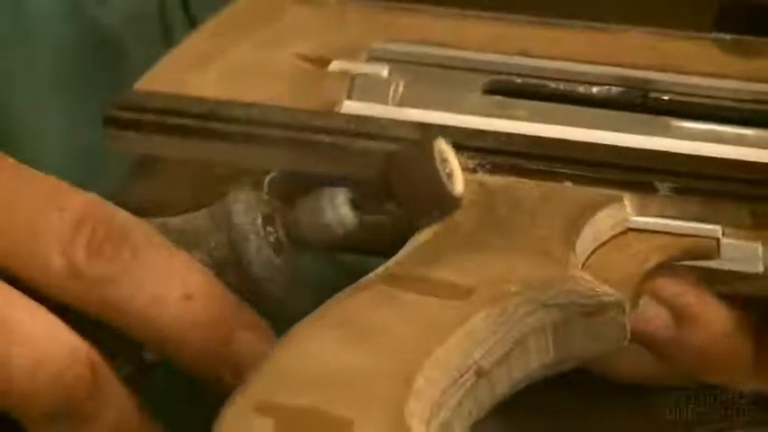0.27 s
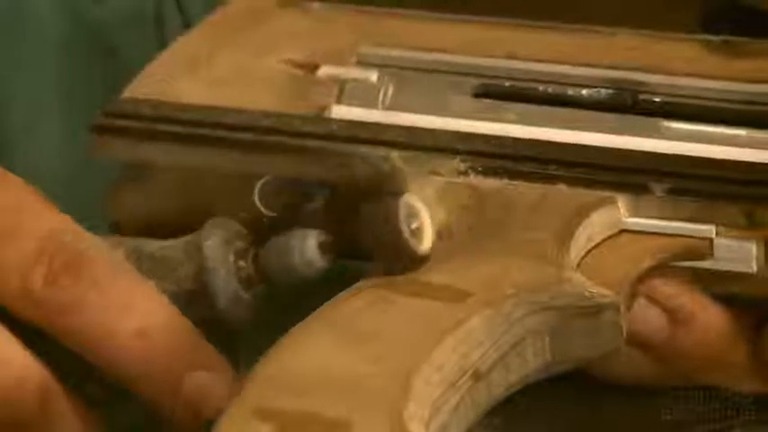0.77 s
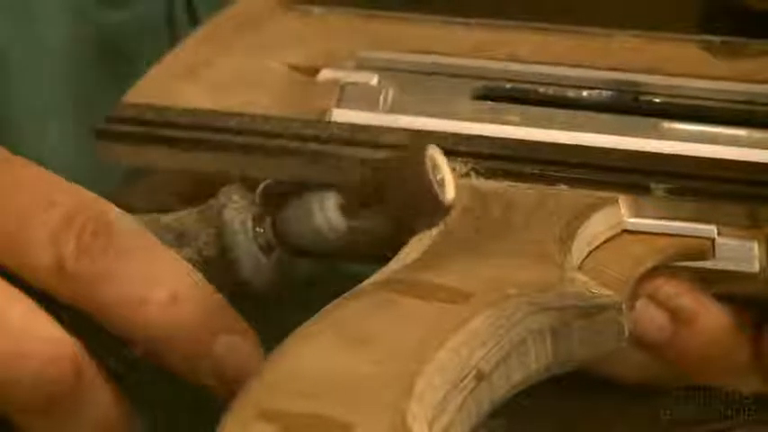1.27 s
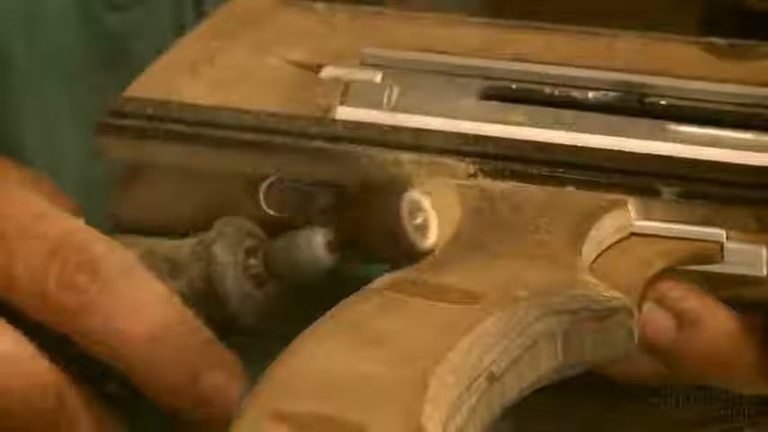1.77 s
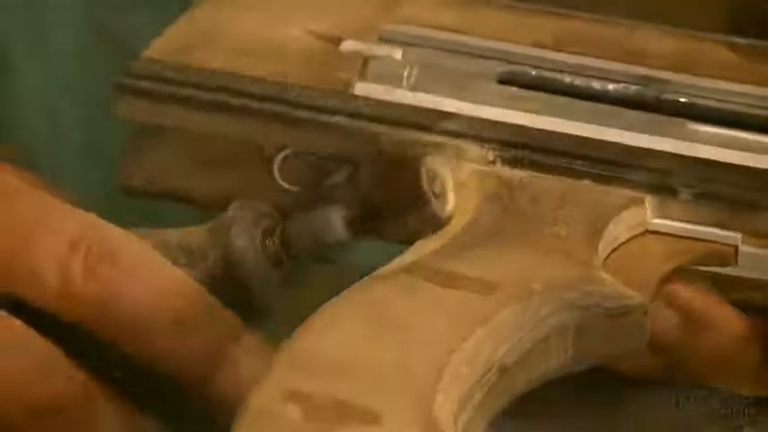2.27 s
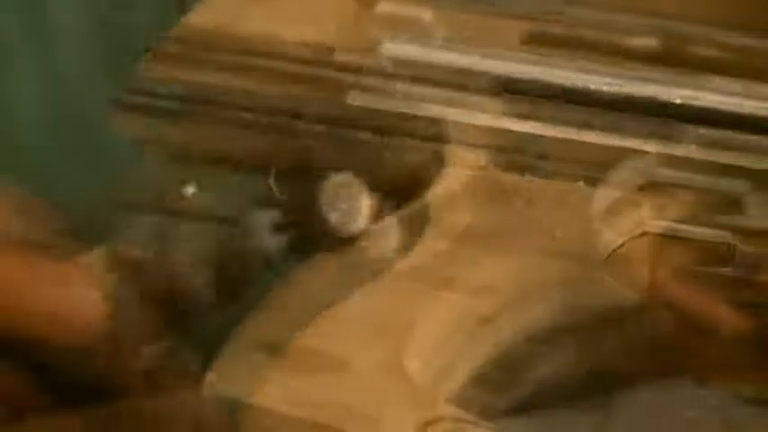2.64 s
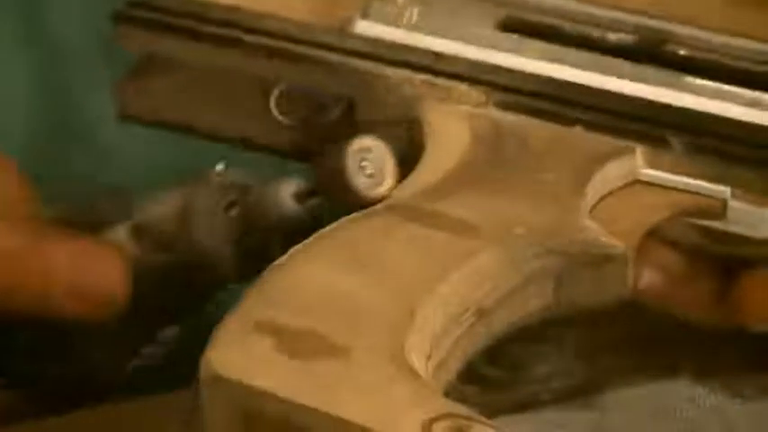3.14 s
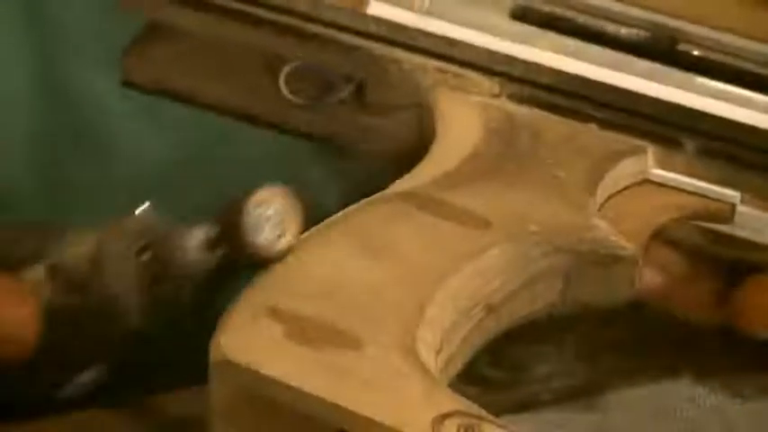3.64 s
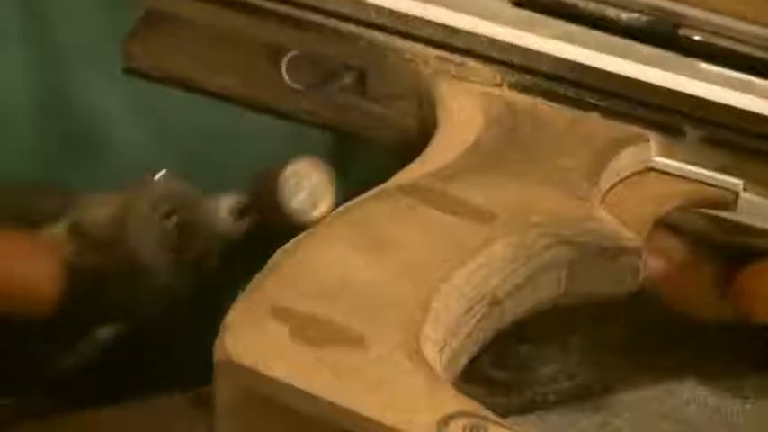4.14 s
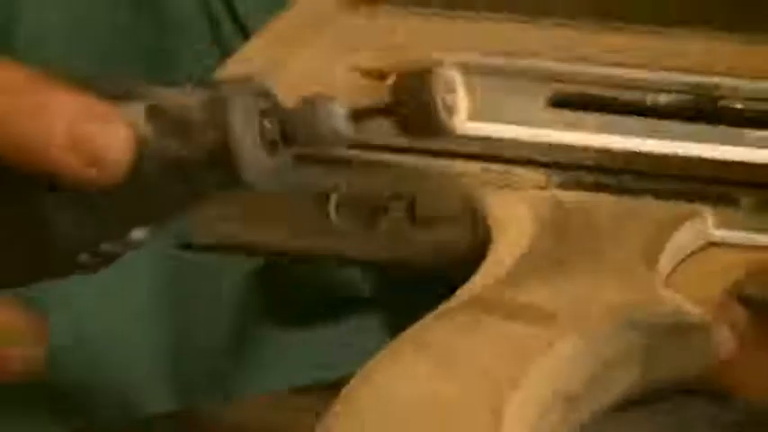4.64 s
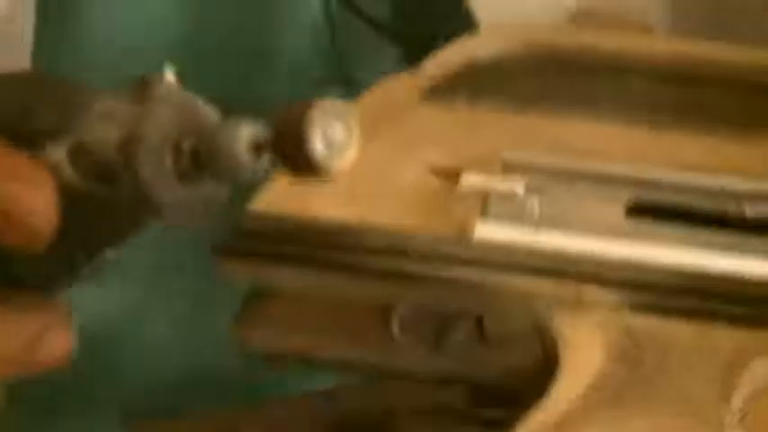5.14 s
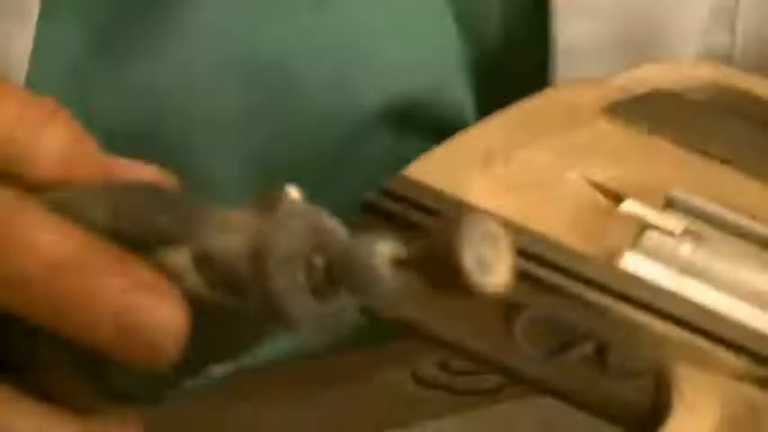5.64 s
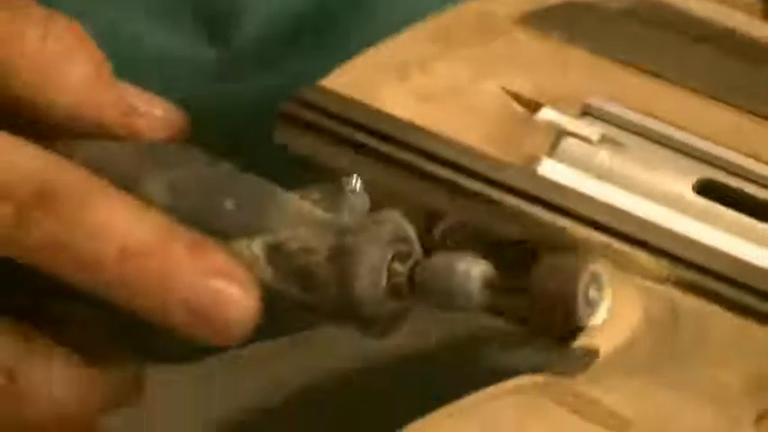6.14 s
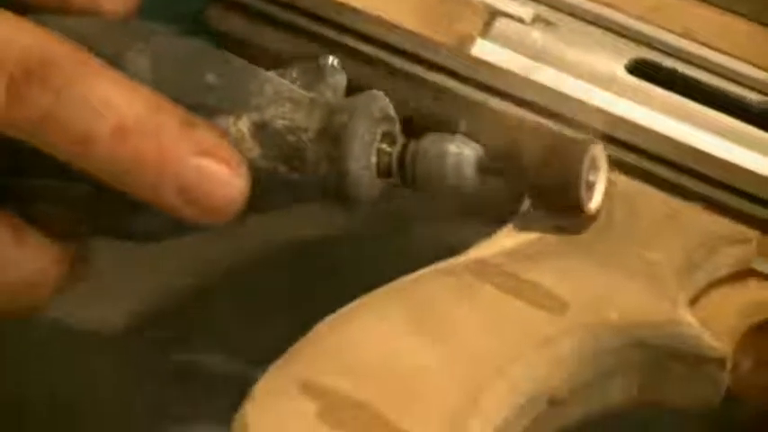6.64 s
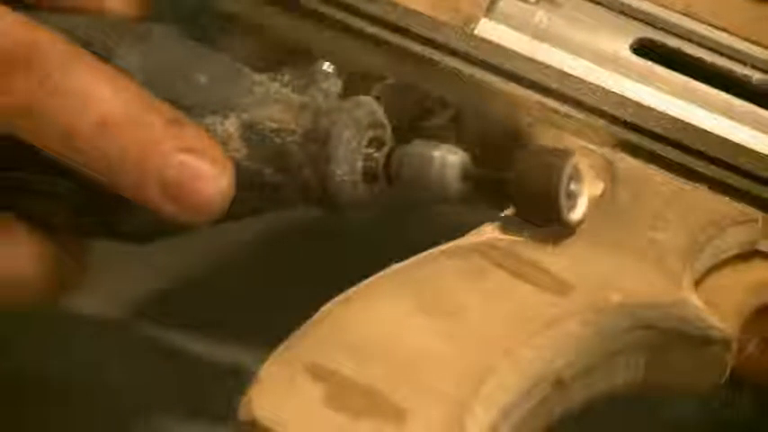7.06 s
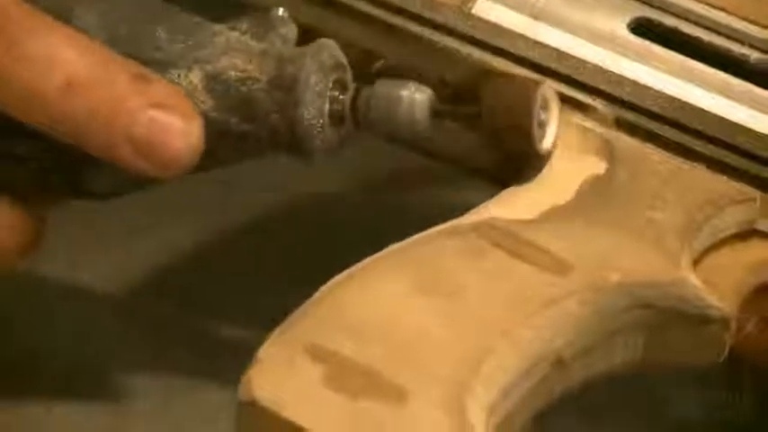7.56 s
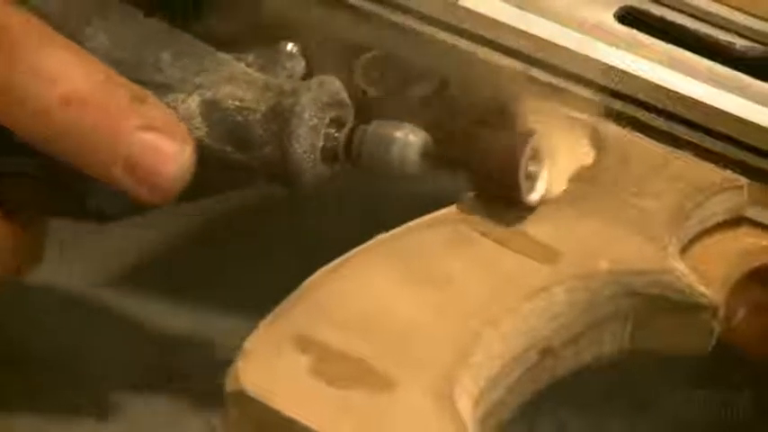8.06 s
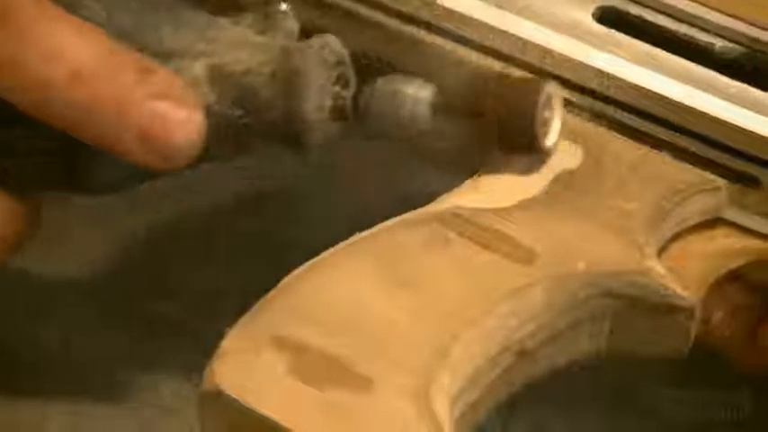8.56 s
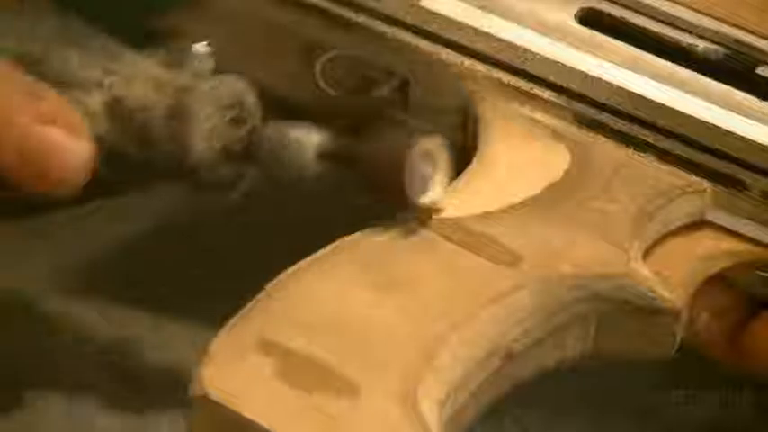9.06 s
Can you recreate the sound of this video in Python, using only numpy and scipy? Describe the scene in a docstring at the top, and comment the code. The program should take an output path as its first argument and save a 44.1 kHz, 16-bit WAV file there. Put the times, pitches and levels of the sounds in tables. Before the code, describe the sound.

A small handheld rotary tool with a sanding drum runs continuously, close and dry, over very faint low workshop rumble. From 0 to 2.3 s a slower, buzzy whine with steady harmonics makes five strokes on wood, roughly two per second; in each the pitch sags and gritty hiss swells mid-stroke, with a light scrape tap at 0.1 and 1.5 s. Around 2.4 s it quickly cross-fades to a much higher, louder, richer whine, with lighter strokes until 4.2 s. From 4.3 to 6.2 s the tool runs free and swings past: treble hiss rises, peaking near 5.4 s, and cooling air buffets the microphone with low puffs, strongest at 5.3 to 5.55 s. At 6.5 s the drum catches with a tiny skip, and sanding resumes, the whine dipping and fluttering through rasping strokes until 9.3 s, with small taps near 8.8 s.

```python
"""A handheld rotary tool sands wood close to a microphone: first a whine at a slow setting, in long strokes.
Each stroke along the wood changes the grit's hiss, mostly upward, and drags the speed down.
Near 2.4 s a cross-fade leads to a fast setting. Both whines are sines at multiples of the shaft speed,
rippled by the mains, with ball bearing lines between them; grit and fan air are noise pulsing with the turn.
From 4.3 to 6.2 s the tool swings past and its cooling air buffets the microphone; then sanding goes on."""
import sys
import numpy as np
from scipy import signal
from scipy.fft import rfft, irfft, next_fast_len
from scipy.io import wavfile
from scipy.ndimage import uniform_filter1d, map_coordinates

SR = 44100
rng = np.random.default_rng(int(sys.argv[2]) if len(sys.argv) > 2 else 0)


def transcribe(signal):
    """Save signal, clipped to [-1, 1], as a 16-bit WAV file at the path in sys.argv[1]."""
    frames = np.atleast_2d(signal).T
    limited = np.clip(frames, -1, 1)
    pcm = np.round(limited * 32767).astype(np.int16)
    wavfile.write(sys.argv[1], SR, pcm)


def makeup_ratio(level_db):
    """Linear amplitude ratio for a level in decibels (20 dB per factor of ten)."""
    decades = np.asarray(level_db, float) / 20
    return 10 ** decades


N = 410571
T = np.arange(N) / SR
STEP = 64  # samples between two values of a slow control
SLOW = T[::STEP]  # times at which slow controls are worked out
SWITCH_S = 2.425  # the fast setting takes over here


def unit(x):
    """Scale to rms 1."""
    return x / np.sqrt(np.mean(x ** 2) + 1e-20)


def along(points, hz):
    """Read (Hz, value) points on a log frequency axis."""
    f, v = np.transpose(points)
    return np.interp(np.log(hz + 1), np.log(f + 1), v)


def curves(rows):
    """One value per sample for each column after the time."""
    s, *cols = np.transpose(rows)
    return [np.interp(T, s, c) for c in cols]


def drift(rate):
    """A smooth random curve at the slow times, with up to 39 random knots a second."""
    knots = rng.standard_normal(int(N * 40 / SR))
    return map_coordinates(knots, [SLOW * min(rate, 39)])


def wobble(rate):
    """The same random curve, one value per sample."""
    return np.interp(T, SLOW, drift(rate))


def capped(x):
    """Dips pass freely, rises level off."""
    return np.minimum(x, np.tanh(x))


def filtered(x, response):
    """x times a response of frequency."""
    m = next_fast_len(N + 8192)
    return irfft(rfft(x, m) * response(np.fft.rfftfreq(m, 1 / SR)), m)[..., :N]


def noise(colour, patchy_db):
    """Coloured noise of rms 1 in long narrow patches; the dark ones go deeper than the bright ones rise."""
    z = signal.stft(rng.standard_normal(N), nperseg=512)[2]
    field = uniform_filter1d(rng.standard_normal(z.shape), size=3, axis=0)
    field = unit(uniform_filter1d(field, size=30, axis=1))
    patched = signal.istft(z * makeup_ratio(patchy_db * capped(field)), nperseg=512)[1][:N]
    return unit(filtered(patched, lambda hz: makeup_ratio(along(colour, hz))))


def tool():
    """The whines of both settings cross-fade around the switch, under the shared hiss."""
    fast_share = np.interp(T, [1.95, SWITCH_S, SWITCH_S + .004, 2.85], [0, .45, .8, 1])
    slow_heard, fast_heard = np.sqrt(1 - fast_share), np.sqrt(fast_share)
    # the strong lines fade on their own: the fast ones early and softly, the slow ones with a short tail
    before = T < SWITCH_S
    leaving = np.where(before, 1, np.interp(T, [SWITCH_S, 3.0], [.33, 0]))
    coming = np.where(before, np.interp(T, [1.98, SWITCH_S], [.25, .6], left=0), 1)
    slow_turn, slow_lines = setting(False, grit(), 32, leaving, slow_heard)
    over_usual_db = curves(RASP_LEVEL)[0] + 34
    fast_turn, fast_lines = setting(True, over_usual_db, 22, coming, fast_heard)
    turn = np.where(before, slow_turn, fast_turn)
    return slow_lines + fast_lines + hiss(turn, slow_heard, fast_heard)


# How the tool's body sounds and how firmly it meets the wood:
# (time [s], housing roar [dB], weaker shaft lines over the rasp [dB], contact with the wood [0-1])
BODY = [(0, -45, 5.5, 1), (2.3, -45, 0.5, 0.43), (2.45, -44, -1, 0.12), (2.8, -42, 7.5, 0.6),
        (3.2, -42, -8, 0.87), (4.3, -41.5, 6.5, 0.36), (5.5, -43.5, 12.5, 0.24), (6.5, -41.5, 9, 0.43),
        (6.7, -41, 6, 0.74), (7.8, -40.5, 7, 0.69), (9.31, -39.5, 10.5, 1)]


def setting(fast, drive_db, top_order, share, heard):
    """The tool at one speed: returns the shaft angle and all its lines, pulsing a little with the mains."""
    ripple = np.sin(2 * np.pi * 120 * T)  # rectified mains shakes torque and speed
    shaft_hz = shaft(fast)
    angle = shaft_angle(shaft_hz, ripple)
    roar_db, others_db, contact = np.array(curves(BODY))[:, ::STEP]
    pressed = np.minimum(strokes()[0].sum(axis=0), 1)[::STEP]
    strong = strong_orders(angle, fast, drive_db[::STEP], contact, pressed)
    weak = weak_orders(angle, shaft_hz[::STEP], fast, top_order, others_db, contact, pressed)
    balls = bearing(angle, roar_db)
    return angle, strong * share * (1 + 0.04 * ripple) + heard * (weak + balls)


def line(angle, order, db, sway_db, blur, rate):
    """One sine at a multiple of the shaft turn; as the grip changes its phase drifts and its level sways."""
    phase = order * angle + rng.uniform(0, 2 * np.pi) + np.interp(T, SLOW, blur * drift(25))
    sway = capped(drift(rate)) + .5 * drift(38)  # slow part dips deeper than it rises, plus a flutter
    level = np.interp(T, SLOW, makeup_ratio(db + sway_db * sway))
    return np.sqrt(2) * level * np.sin(phase)


# Strong lines of the slow whine:
# (shaft order [multiple of shaft speed], level [dB], level gained per dB of stroke grit [dB/dB])
SLOW_ORDERS = [(1, -49, 0.9), (2, -56, 0.7), (3, -47.5, -0.05), (6, -47, 0), (7, -49, 0.93), (18, -51.5, 0)]
# Strong lines of the fast whine:
# (shaft order [multiple of shaft speed], level [dB], level gained per dB of rasp over its usual [dB/dB])
FAST_ORDERS = [(1, -41.5, 0.0), (2, -37, 0.6), (3, -38.5, 0.0), (4, -38.5, 1.1), (5, -38.5, 1.3),
               (6, -41, 0.72), (7, -44, 1.44), (8, -49, 1.16), (9, -46, 1.06), (10, -52.5, 1.26),
               (11, -53.5, 1.25), (14, -54.5, 2), (18, -43, 1.25)]


def strong_orders(angle, fast, drive_db, contact, pressed):
    """The strong lines of the whine; the higher ones sway and blur more while the drum presses on the wood."""
    total = 0
    for row_order, db, grows in FAST_ORDERS if fast else SLOW_ORDERS:
        k = round(row_order)
        dropouts = breaks(contact * min(k, 8) / 8 * (k < 12))
        level_db = db + grows * drive_db + swell(k, fast) + dropouts
        sway_db = 2 + (0.47 * contact + 1.1 * pressed) * (min(k - 1, 5) / 3) ** 0.69
        blur = 0.15 + 0.064 * k * (contact + pressed)
        total = total + line(angle, k, level_db, sway_db, blur, rate=10)
    return total


# Tone colour of the weaker lines: (frequency [Hz], level added [dB])
WEAK_COLOUR = [(1500, -19), (3300, -26), (4600, -28.5), (5400, -21), (7350, -26), (8200, -24), (10800, -27)]


def weak_orders(angle, shaft_hz, fast, top_order, others_db, contact, pressed):
    """All other multiples of the shaft speed, following the rasp and flickering with contact and pressure."""
    strong = [round(row[0]) for row in (FAST_ORDERS if fast else SLOW_ORDERS)]
    base_db = others_db + (curves(RASP_LEVEL)[0] + 1.13 * grit() + 1.17 * landings())[::STEP]
    flare_db = 5 * (.5 * contact + 1.1 * pressed)
    total = 0
    for k in range(1, top_order):
        if k in strong:
            continue
        colour_db = along(WEAK_COLOUR, k * shaft_hz)
        colour_db = colour_db + 3 * (1 - 1.8 * contact) * capped(drift(4.5))
        colour_db = colour_db + flare_db * (0.16 + capped(drift(24)))
        level_db = base_db + colour_db + swell(k, fast) + breaks(contact)
        total = total + line(angle, k, level_db, 2 + 2.0 * contact, 1.5 * contact, rate=10 + k / 2)
    return total


# Lines of the balls passing in the bearing: (shaft order [multiple of shaft speed], level over the roar [dB])
BALL_LINES = [(3.451, -14), (4.447, -20), (5.451, -13.5)]


def bearing(angle, roar_db):
    """Balls roll past at uneven multiples of the shaft speed, so their lines fall between the others."""
    return sum(line(angle, k, roar_db + db, sway_db=4.5, blur=0.29, rate=9.7) for k, db in BALL_LINES)


# The drum catches and the whine skips: (time [s], jump [share of a turn])
SKIPS = [(6.515, 0.417), (6.524, 0.1016)]


def shaft_angle(shaft_hz, ripple):
    """Adds up the speed into an angle; the mains ripple on it gives side lines that grow with the order."""
    angle = 2 * np.pi * np.cumsum(shaft_hz) / SR + 0.019 * ripple
    for s, turns in SKIPS:
        angle = angle + 2 * np.pi * turns * np.clip((T - s) / 0.0022, 0, 1)
    return angle


# Steady load between strokes, slow then fast setting: (time [s], drag [% of free speed])
SLOW_DRAG = [(0.0, 9.5), (1.0, -0.0), (2.45, 10)]
FAST_DRAG = [(1.999, 4.0), (2.598, 5.5), (3.8, -0.0), (4.3, 1), (5.202, 0.66), (6.449, 0.72), (6.801, 6.5),
             (7.502, 3.5), (8.201, 8.5), (9.31, -0.5)]


def shaft(fast):
    """Load pulls the speed down; the rotor's inertia lets it sag and recover with one time constant."""
    free_hz, steady = (532.2, FAST_DRAG) if fast else (385.8, SLOW_DRAG)  # speed of the unloaded shaft
    press, drag, late = strokes()
    load = curves(steady)[0] + (drag * (late == fast)) @ press
    rotor_s = .48
    keep = np.exp(-1 / (rotor_s * SR))
    sag = load[0] + signal.lfilter([1 - keep], [1, -keep], load - load[0])
    return free_hz * (1 - sag / 100)


# The drum is pushed along the wood:
# (start [s], let go [s], grit change before fading and scaling [dB], drag at full pressure [% of free speed])
STROKES = [(0.052, 0.496, 6, 13.7), (0.692, 1.071, 3.5, 19.6), (1.08, 1.486, 8, 21.5),
           (1.498, 1.89, 7.5, 15.4), (1.942, 2.324, 6, 10.6), (2.727, 2.8, 2.5, 39.0),
           (3.003, 3.186, -2, 16.5), (3.322, 3.661, 0.5, 10.4), (3.681, 4.151, 0.4, 4.2),
           (6.491, 6.716, 2.5, 18), (7.02, 7.315, -2, 7.1), (7.554, 7.979, 3, 10.8),
           (8.031, 8.36, 1.5, 6.2), (8.626, 8.823, 4.5, 22.5), (9.04, 9.245, 4, 22)]
LET_GO_S = .09  # pressure and bite end this quickly


def strokes():
    """Pressure 0-1 of each stroke, which builds slowly and ends fast; its drag; whether it is a fast one."""
    start, end, _, drag = np.transpose(STROKES)
    build = np.clip((T - start[:, None]) / .28, 0, 1)
    release = np.clip(1 + (end[:, None] - T) / LET_GO_S, 0, 1)
    return build * release, drag, start > SWITCH_S


def grit():
    """dB by which strokes change the grit: the drum bites suddenly in mid-stroke, then the bite fades."""
    start, end, grit_db, _ = np.transpose(STROKES)[:, :, None]
    begin = start + 0.42 * (end - start)
    bite = np.clip((SLOW - begin) / 0.055, 0, 1) * np.clip(1 + (end - SLOW) / LET_GO_S, 0, 1)
    fade = 1 - 0.31 * np.clip((SLOW - begin) / (end - begin), 0, 1)
    return np.interp(T, SLOW, np.sum(grit_db * bite * fade, axis=0))


# The drum taps the wood: (time [s], treble lift [dB], length [s])
LANDINGS = [(0.092, 8.5, 0.033), (1.53, 4.5, 0.012), (8.825, 4.5, .009), (8.843, 3, .007)]


def landings():
    """dB by which each tap lifts the treble: up at once, then a rounded fall."""
    s, db, length = np.transpose(LANDINGS)[:, :, None]
    return np.sum(db * (T > s) * np.exp(-(np.abs(T - s) / length) ** 3), axis=0)


# Single lines swell or fade for a while, probably as the tool turns in the hand:
# (middle [s], length [s], shaft order [multiple of shaft speed], level change [dB])
SWELLS = [(0.522, 0.27, 6, 5), (0.913, 0.91, 2, -7.5), (1.05, 0.29, 7, -13), (1.808, 0.16, 7, -8.5),
          (1.905, 0.041, 7, 6.5), (1.913, 0.055, 2, 9), (0.48, 0.11, 8, 10), (0.994, 0.2, 6, -2),
          (2.0, 1.4, 3, -9.5), (2.045, 0.057, 7, 6.5), (2.098, 0.047, 7, -12), (2.16, 0.14, 7, 7),
          (2.547, 0.25, 4, -4), (2.589, 0.46, 5, 6.5), (2.77, 0.076, 4, -10), (2.87, 0.16, 1, -12.5),
          (2.839, 0.1, 5, -16), (2.707, 0.13, 14, 16), (3.055, 1.6, 7, -4.5), (3.174, 0.18, 5, -10),
          (3.205, 0.94, 3, 4.5), (3.42, 3.34, 11, 5), (3.218, 0.35, 1, -11), (3.636, 0.17, 2, -6.5),
          (3.852, 0.28, 7, -2), (3.707, 0.48, 1, -16), (4.043, 0.45, 3, 4), (3.538, 0.2, 5, -11),
          (4.294, 0.14, 5, 4.5), (4.36, 0.32, 18, 4.5), (4.362, 0.35, 4, -5), (4.53, 0.38, 2, -6.5),
          (4.544, 0.61, 9, -12), (4.676, 0.4, 8, 10.5), (4.77, 0.14, 5, 4.5), (4.87, 1.63, 7, -12),
          (5.026, 0.25, 18, -7), (5.185, 0.52, 4, -14.5), (5.461, 0.42, 3, -8), (5.543, 0.15, 8, 11),
          (5.534, 0.23, 2, -9.5), (5.859, 0.34, 8, -22), (6.17, 1.01, 14, 11), (6.19, 0.71, 4, -13.5),
          (6.196, 0.41, 18, -10), (6.287, 1.29, 6, -9), (6.611, 0.14, 5, 5.5), (6.635, 0.058, 2, 6.5),
          (6.657, 0.17, 3, -11.5), (7.972, 0.12, 7, 6), (8.363, 0.37, 1, -5.5), (6.842, 0.37, 4, -10),
          (6.963, 0.83, 5, -8), (7.32, 4.7, 18, -2), (7.651, 1.5, 8, -20), (7.932, 0.17, 5, -20),
          (8.128, 0.32, 3, 7.5), (8.16, 0.1, 4, 5), (8.45, 0.16, 6, 6.5), (8.457, 1.22, 2, -11),
          (8.66, 0.19, 4, -11), (8.603, 0.049, 5, 6), (8.755, 2, 9, -6), (9.195, 0.45, 1, 4)]


def swell(order, fast):
    """dB by which one line swells or fades, each time with a flat top."""
    total = 0
    for s, length, k, db in SWELLS:
        if round(k) == order and (s > SWITCH_S) == fast:
            total = total + db * np.exp(-(2 * (SLOW - s) / length) ** 6)
    return total


def breaks(depth):
    """dB by which a line drops out for a moment while the drum chatters on the wood."""
    return -20 * depth * np.clip(-drift(17) - .7, 0, 1)


# Treble level of grit and fan between strokes, before contact and chatter: (time [s], level [dB])
RASP_LEVEL = [(0.0, -41), (0.6, -42.5), (2.41, -37.5), (2.44, -34.5), (4.1, -33), (4.4, -29), (5.0, -29),
              (5.4, -25), (5.8, -29.5), (6.5, -30.5), (6.9, -34), (9.31, -37.5)]
# Tone colour of the rasp: (frequency [Hz], relative level [dB per Hz])
RASP_COLOUR = [(1600, -32.5), (3000, -23), (4300, -22.5), (8200, -18.5), (11000, -19)]
# Tone colour of the housing roar, slow then fast setting: (frequency [Hz], relative level [dB per Hz])
SLOW_ROAR = [(200, -19.5), (1300, -10), (2200, 0.5), (2900, -11.5), (5000, -37)]
FAST_ROAR = [(200, -32), (620, -16.5), (870, -14), (1050, -7.5), (1300, -7.5), (2400, -5.5), (4200, -16),
             (6000, -56)]


def hiss(turn, slow_heard, fast_heard):
    """Noise of grit, fan and housing; the drum is slightly out of round, so it bites hardest once a turn."""
    bite = makeup_ratio(3.05 * np.cos(turn) + 1.0 * np.cos(2 * turn))
    roar_db, _, contact = curves(BODY)
    chatter_db = 1.4 * contact * wobble(22) + .9 * wobble(18)
    rasp_db = curves(RASP_LEVEL)[0] + 0.83 * grit() - 2.5 + 5.75 * contact + chatter_db
    rasp = makeup_ratio(rasp_db) * unit(bite * noise(RASP_COLOUR, patchy_db=6.5))
    # a tap scrapes mainly above 4500 Hz
    taps = filtered(rasp * (makeup_ratio(landings()) - 1), lambda hz: 1 / np.sqrt(1 + (4500 / (hz + 1)) ** 6))
    housing = slow_heard * noise(SLOW_ROAR, patchy_db=3.5) + fast_heard * noise(FAST_ROAR, patchy_db=5.5)
    roar = makeup_ratio(roar_db + 0.94 * contact * wobble(11)) * unit(np.sqrt(bite) * housing)
    return rasp + taps + roar


# Cooling air on the microphone, before its random lumps: (time [s], level [dB])
BUFFET = [(4.3, -65), (4.9, -76), (4.95, -51), (5.2, -50), (5.42, -59), (5.53, -40), (5.75, -55),
          (6.2, -66)]
# Tone colour of that air: (frequency [Hz], relative level [dB per Hz])
AIR_COLOUR = [(55, -17), (90, 2), (170, -4.5), (300, -11.5), (500, -15), (900, -75)]
# Sudden pressure pushes: (time [s], peak level [dB], frequency [Hz])
PUFFS = [(2.421, -44.5, 322.6), (4.567, -38, 166.6), (4.93, -39, 93.4), (5.317, -20.5, 170),
         (5.509, -29, 103.6), (5.534, -24, 170), (5.553, -25.5, 83.4), (5.644, -37, 125.6)]


def air():
    """Lumpy turbulence on the microphone, with single pressure pushes of about two cycles."""
    blowing = (T > BUFFET[0][0]) & (T < BUFFET[-1][0])
    gust_db = curves(BUFFET)[0] + 2.5 * wobble(30)
    total = blowing * makeup_ratio(gust_db) * noise(AIR_COLOUR, patchy_db=1.5)
    for s, db, hz in PUFFS:
        swelling = np.exp(-((T - s) * hz / 0.89) ** 2)
        total = total + makeup_ratio(db) * swelling * np.cos(2 * np.pi * hz * (T - s))
    return total


# Tone colour of the workshop: (frequency [Hz], relative level [dB per Hz])
ROOM_COLOUR = [(60, -10), (85, 14.5), (140, 5.5), (420, -38), (700, -20.5)]


def room():
    """The workshop's low rumble: steady, faint noise, strongest in the bass."""
    return makeup_ratio(-66) * noise(ROOM_COLOUR, patchy_db=1.5)


def scene():
    """Tool, air and the workshop's low rumble."""
    return (tool() + air() + room())[None]


def low_pass(x):
    """Removes everything above the highest recorded frequency."""
    return signal.sosfilt(signal.butter(12, 11820, fs=SR, output="sos"), x)


def record(dry):
    """The microphone rolls off the deep bass below 76 Hz; the band ends sharply at 10725 Hz."""
    band = lambda hz: (hz < 10725) / np.sqrt(1 + (76 / (hz + 1)) ** 8)
    mix = filtered(dry, band)
    return low_pass(mix)


dry = scene()
out = record(dry)
transcribe(out)
```